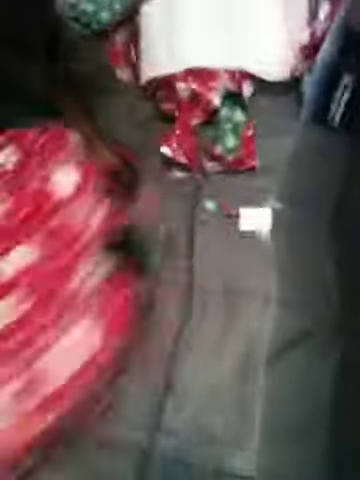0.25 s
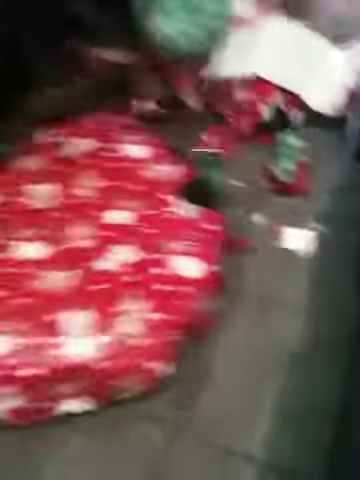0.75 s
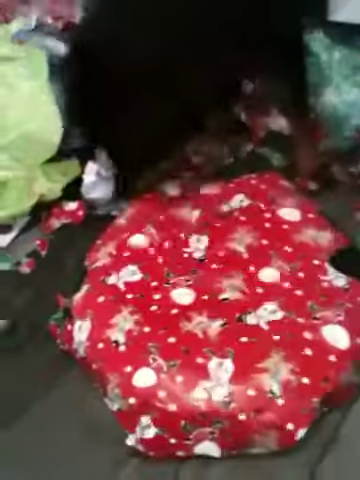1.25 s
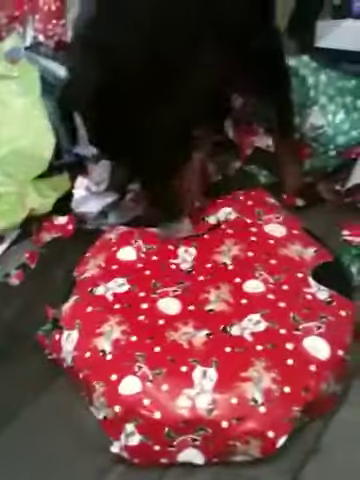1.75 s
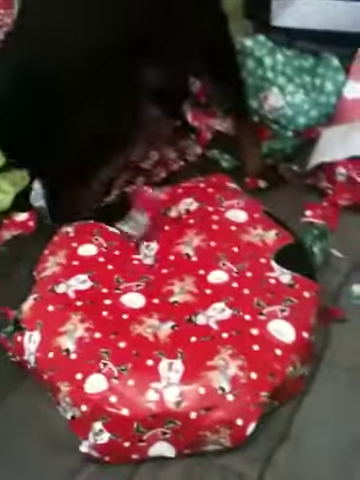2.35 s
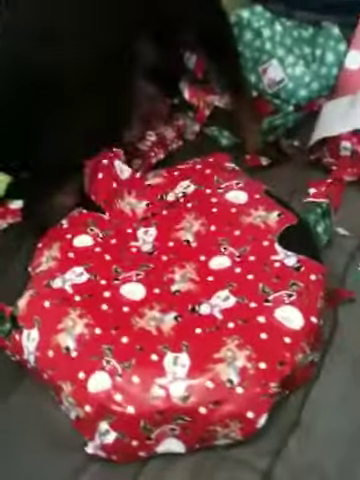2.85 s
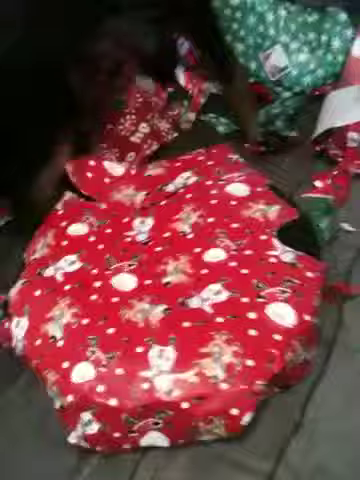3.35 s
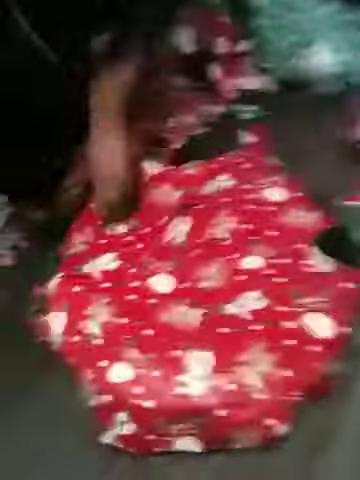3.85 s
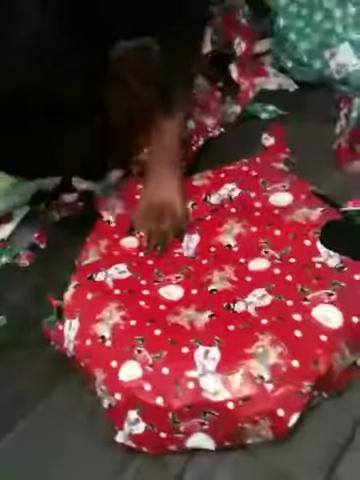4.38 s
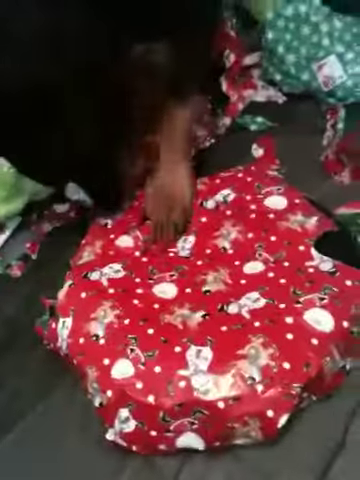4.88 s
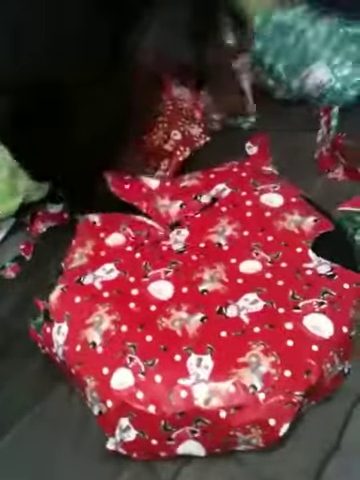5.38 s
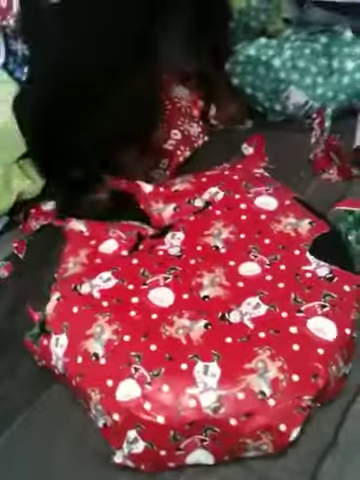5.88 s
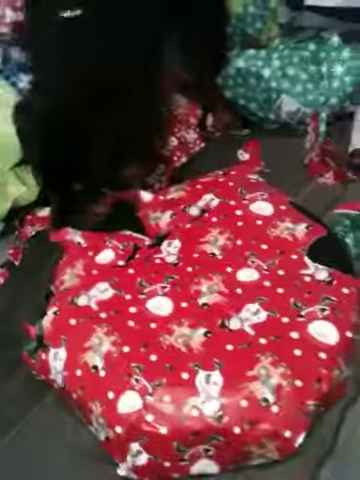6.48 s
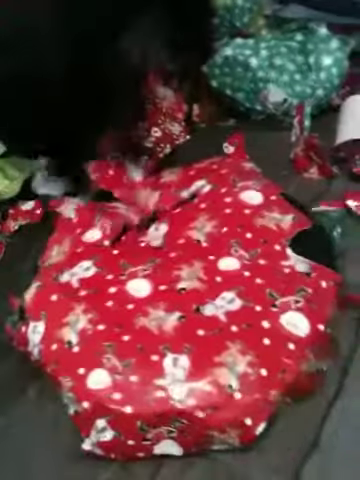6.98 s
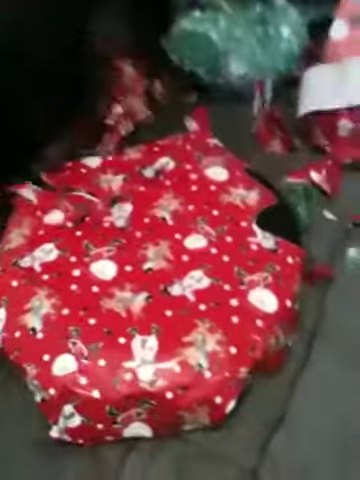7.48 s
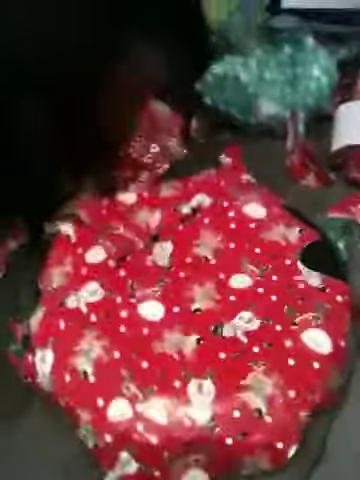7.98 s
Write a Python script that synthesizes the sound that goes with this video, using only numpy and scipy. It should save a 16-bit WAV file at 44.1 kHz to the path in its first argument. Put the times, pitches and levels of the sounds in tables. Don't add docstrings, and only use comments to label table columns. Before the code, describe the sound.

A puppy paws and tears at stiff wrapping paper on a large parcel, heard close on a phone microphone in a small furnished room with a short, soft reverberation. Quick crinkles open the scene, thin out from about 0.4 to 1.1 seconds, then swell into dense, bright crackling and tearing between 1.2 and 2.0. A near-silent lull follows, with tiny ticks, until a sharp snap at 2.8 and renewed rustling around 3.0 to 3.7. The strongest handling comes from 4.0 to 4.8: hard snaps at about 4.07, 4.27 and 4.53, with hollow, drum-like boom from the taut sheet. Crisp ripping continues around 5.1 to 5.2, then lighter scattered crinkles, with a small burst near 6.7. It is almost quiet from 7.0 to 7.7, before a final flurry of crackles to the end. Low room hiss and a very faint high whine stay constant underneath.

```python
import sys
import numpy as np
from scipy import signal
from scipy.fft import rfft, irfft
from scipy.io import wavfile

SR = 44100
rng = np.random.default_rng(int(sys.argv[2]) if len(sys.argv) > 2 else 0)


def generate_wav(sig):
    pcm = np.round(np.clip(np.atleast_2d(sig).T, -1, 1) * 32767).astype(np.int16)
    wavfile.write(sys.argv[1], SR, pcm)


def gain_from_db(level_db):
    decades = np.asarray(level_db, float) / 20
    return 10 ** decades


N = 362943

EDGES_HZ = 100 * 2 ** np.arange(0, 7.5, 1 / 3)
CENTRES_HZ = np.sqrt(EDGES_HZ[1:] * EDGES_HZ[:-1])

# (time [s], crackle level [dB], parcel boom re crackle [dB],
# crispness re crackle [dB], loudest pitch [Hz])
HANDLING = [(0.0, -47, -6, -12, 2000), (0.13, -54.5, -7, -8, 1710), (0.23, -48, -12, -10.5, 2990),
            (0.5, -65, -5, -11.5, 1810), (0.62, -56, -8, -14, 1140), (0.66, -64, -2, -8, 1390),
            (1.08, -57.5, -5, -20, 1980), (1.12, -58, -10, -10, 1300), (1.19, -64, -2, -13, 2670),
            (1.24, -60, -6, -7, 3000), (1.28, -48.5, -4, -19, 1580), (1.4, -44, -10, -11, 2590),
            (1.42, -54, -11, -12, 2770), (1.46, -52, -13, -15, 1860), (1.58, -48.5, -15, -12, 3220),
            (1.6, -49, -7, -16, 3500), (1.72, -42, -9, -5.5, 2630), (1.81, -47, -15, -10.5, 2970),
            (1.88, -41, -7.5, -9, 2620), (1.97, -50, -6, -12, 2620), (2.06, -79, 10, -14, 1850),
            (2.08, -73, 4, -11, 1070), (2.48, -83.5, 0, -2, 2300), (2.54, -64, -10, -12, 3500),
            (2.63, -88.5, 16, -5, 1440), (2.73, -89, -2, -1, 1290), (2.79, -57, -24, -17, 1770),
            (2.84, -67, -7, -21, 1740), (3.03, -54, -11, -9, 3010), (3.09, -58, -7, -11, 1240),
            (3.14, -48, -12, -16, 2060), (3.16, -56, -5, -10, 2200), (3.23, -49.5, -3, -15.5, 1320),
            (3.32, -74, -6, -11, 1200), (3.39, -73, -3, -7, 2100), (3.48, -70, 1, -17, 1140),
            (3.6, -64.5, -9, -20, 1740), (3.64, -50.5, -13, -15, 1560), (3.71, -54, -14, -15, 2370),
            (3.78, -75.5, -6, -13, 1750), (3.96, -48, -13, -12, 1830), (4.01, -43.5, -6, -14, 2100),
            (4.08, -37, -5, -4, 1320), (4.15, -48, -4, -13, 1740), (4.19, -50, 8, -14, 1110),
            (4.24, -77, -10, -19, 1670), (4.26, -53, 16, -13, 1530), (4.29, -59.5, -1, -22, 1400),
            (4.38, -65, -5, -11, 1420), (4.51, -74.5, 15, -10, 1870), (4.54, -41.5, 8, -1.5, 1780),
            (4.56, -49, 0, -5, 1720), (4.65, -60, -3, -13, 2320), (4.72, -46.5, 0, -8, 1990),
            (4.79, -40, 0, -5.5, 2830), (4.88, -63.5, -3, -14, 2010), (4.95, -59, -6, -6, 2700),
            (5.09, -47, -8.5, -10, 3120), (5.16, -46, -6, -15, 2550), (5.22, -45.5, -17, -15, 3200),
            (5.32, -72, 2, -11, 1990), (5.41, -54.5, -7, -7, 3450), (5.48, -62, -8, -17, 1840),
            (5.52, -59, -17, -18, 1390), (5.57, -52, -10, -4, 2810), (5.62, -52, -5, -15, 1480),
            (5.73, -68.5, -17, -12, 2200), (5.8, -56, -4, -6, 2390), (5.87, -74, -18, -16, 3210),
            (5.91, -58, -14, -11, 2580), (5.96, -62, -1, -7, 1410), (5.98, -51, -15, -17, 1070),
            (6.0, -60, -18, -17, 1090), (6.05, -55.5, -8, -16, 2010), (6.1, -56, -14, -18, 1720),
            (6.35, -64.5, -7, -16, 1920), (6.39, -65, -6, -14, 1380), (6.51, -55, -7, -16, 2290),
            (6.58, -70, -6, -11, 1870), (6.62, -51, -13, -15, 1770), (6.65, -52, -16, -18, 2150),
            (6.69, -56, -19, -19, 1210), (6.72, -47, -20, -16, 1260), (6.76, -57, -18, -15, 1650),
            (6.85, -47.5, -11.5, -15, 1360), (6.97, -53.5, -5.5, -11.5, 1930), (7.15, -82, 2.5, -6, 1790),
            (7.27, -75.5, -6.5, -5, 924), (7.33, -93, 2, -6.5, 1944), (7.5, -80.5, 0, -5, 979),
            (7.54, -67, -5, -13, 1580), (7.72, -64, -9, -12, 1405), (7.77, -77, -7, -12, 2160),
            (7.82, -45, -13, -13, 1920), (7.86, -50, -17, -18, 1880), (7.88, -60, -6, -18, 2690),
            (7.91, -52.5, -27, -11, 2710), (8.0, -59, -13, -14, 1670), (8.09, -56.5, -14, -13, 2430),
            (8.14, -63, 1, -11, 2150), (8.21, -46, -20.5, -17, 2030), (8.23, -65, -9, -18, 2070)]


def crackle():
    cracks_per_s = 2200 * gain_from_db(3.5 * drift(30.0))
    at = np.flatnonzero(rng.random(N) < cracks_per_s / SR)
    s, *columns = np.transpose(HANDLING)
    level_db, boom_db, crisp_db, pitch_hz = [np.interp(at / SR, s, c) for c in columns]
    size_db = level_db + 3.03 * np.minimum(rng.exponential(1, len(at)), 4.0)
    sizes = gain_from_db(size_db + 10) * rng.choice([-1, 1], len(at))
    pitch_hz = pitch_hz * 2 ** rng.normal(0, 0.35, len(at))
    return cracks(at, sizes, pitch_hz, boom_db + 6, crisp_db + 13, focus_db=6.5, ragged_db=5.5)


# (time [s], peak level [dB], loudest pitch [Hz], boom re peak [dB],
# crispness re peak [dB], after-crack level [dB])
CREASES = [(0.023, -35, 1990, -36, -11, -5), (0.1086, -40, 918, -21, -25, -11),
           (0.1096, -38, 1420, -19, -15, -5), (0.1201, -31.5, 1830, -26, -19, -6),
           (0.1861, -44, 2230, -11, -17, -6.5), (0.2223, -35, 3210, -20, -17, 0),
           (0.3031, -34.5, 3050, -21, -17, -5.5), (0.3226, -41, 1970, -15.5, -19, -15),
           (0.4727, -44, 3070, -25, -19, -9), (0.5837, -44, 743, -13, -26, -12),
           (0.6235, -39, 1100, -18, -29, -5), (0.9182, -52.5, 1380, -15, -21, -5.5),
           (0.9931, -57, 856, -24, -20, -5), (1.052, -44.5, 1890, -40, -18, -6),
           (1.1036, -38.5, 807, -25, -15, -6), (1.2153, -47, 3390, -21, -16, -1),
           (1.2282, -37, 3160, -30, -10.5, -4), (1.3234, -31, 3700, -21.5, -22.5, -4.5),
           (1.3889, -27.5, 1770, -20, -12, -7.5), (1.4523, -36.5, 974, -24, -28, -9),
           (1.483, -39, 2630, -18, -21, -7), (1.6004, -30, 4150, -22, -8, -9),
           (1.6857, -26, 2650, -12.5, -20, -8.5), (1.8511, -29, 3830, -13, -17, -9),
           (2.2326, -58.5, 533, -6, -18, -7), (2.409, -60, 1760, -23, -17, -8),
           (2.5275, -48, 3480, -15, -15, -2.5), (2.7791, -28.5, 800, -37, -20.5, -5.5),
           (2.8718, -45.5, 3130, -15, -14, -2), (2.9078, -43, 2050, -37, -13, -9),
           (2.9377, -43, 767, -31, -20, -10), (2.9849, -55, 3540, -23, -18, -6),
           (3.0049, -37.5, 3140, -24.5, -16.5, 1), (3.1, -32.5, 880, -19.5, -24, -6),
           (3.1332, -30.5, 1880, -29, -24, -3.5), (3.2082, -41, 1960, -11.5, -22, -8),
           (3.2377, -35.5, 1350, -23, -25, -8.5), (3.372, -49.5, 1860, -9, -18, -10),
           (3.5359, -46.5, 1860, -16.5, -22, -3.5), (3.5883, -44, 972, -24, -23, -2),
           (3.6172, -40, 3470, -21, -16, -7), (3.6375, -34.5, 925, -24.5, -22, -8),
           (3.7997, -54, 939, -17, -23, -4), (3.8187, -44, 1860, -26, -28, -6),
           (3.88, -41, 1970, -16, -21, -9), (3.9031, -39.5, 1490, -20, -21, 2),
           (3.9614, -38, 1730, -26, -22, 0), (4.0211, -27.5, 3150, -13, -5, -6),
           (4.051, -26.5, 1830, -9.5, -20, -6.5), (4.0708, -16.5, 867, -13.5, -12, -10.5),
           (4.2363, -40.5, 3120, 0.5, -9, -11), (4.2673, -20, 867, -11.5, -10, -11),
           (4.3969, -50.5, 1740, -11, -20, -4), (4.496, -51, 541, 4, -4, -12),
           (4.5334, -14, 1860, -12.5, -13, -9.5), (4.6899, -37.5, 3500, -11, -5, -4),
           (4.7662, -26, 4000, -17.5, -22, -6.5), (4.9135, -52, 3010, -12, -19, -6),
           (4.9363, -43.5, 4200, -10, -14, 0), (4.9794, -39, 4170, -12, -13, 3),
           (5.0741, -32.5, 3660, -28, -20, -8), (5.1483, -29.5, 1750, -14, -20, -8),
           (5.2019, -25.5, 3670, -27, -16, -7.5), (5.3971, -41, 4100, -16.5, -16.5, -5.5),
           (5.4989, -43, 3460, -23, -25, -8), (5.5194, -43.5, 1280, -26, -28, -2),
           (5.5365, -45, 915, -19, -14, -10), (5.5631, -44, 4150, -18, -8, -11),
           (5.5732, -34.5, 5430, -18.5, -16.5, -6.5), (5.7544, -44.5, 2140, -23, -12, -5),
           (5.7938, -37.5, 1870, -24, -7, -8.5), (5.8678, -38.5, 3650, -29.5, -14, -6),
           (5.8935, -39.5, 2540, -23, -19, -5), (5.9734, -41.5, 970, -20, -28, -0.5),
           (6.137, -44.5, 1850, -20, -25, -8), (6.3896, -42.5, 1400, -22.5, -30, -5.5),
           (6.4982, -38.5, 2070, -19, -17.5, -8), (6.6199, -40.5, 861, -22.5, -23, -5.5),
           (6.6834, -44, 1940, -22, -24, -2), (6.7062, -28.5, 980, -35, -41, -4),
           (6.7935, -34.5, 1860, -21, -22, -2.5), (7.3482, -61, 1730, -18.5, -17.5, 2),
           (7.55, -49, 2520, -20, -24.5, -7.5), (7.77, -51.5, 1490, -30, -17, -6.5),
           (7.7909, -44, 1850, -11, -22, -9), (7.8084, -32.5, 1860, -22, -25, -5),
           (7.896, -33, 3330, -26, -19, -4.5), (7.9304, -36.5, 1860, -28, -18, -4),
           (8.0135, -44, 1140, -30, -24, -4), (8.075, -43, 1850, -21, -13, -4),
           (8.09, -37.5, 3150, -30, -17, -5), (8.1654, -40.5, 1900, -23, -14.5, -3),
           (8.1942, -28, 1860, -40, -27, -15.5)]


def snaps(count=7):
    s, peak_db, pitch_hz, boom_db, crisp_db, after_db = np.transpose(CREASES)[:, :, None]
    chance = rng.random((len(CREASES), 2, count))
    late = chance[:, 0] * (np.arange(count) > 0)
    at = np.round((s + 0.018 * late) * SR).astype(int)
    size_db = peak_db + 19.5 + after_db * (late > 0) - 9.8 * late
    sizes = gain_from_db(size_db) * np.sign(chance[:, 1] - 0.5)

    def spread(column):
        return np.broadcast_to(column, at.shape).ravel()

    return cracks(at.ravel(), sizes.ravel(), spread(pitch_hz), spread(boom_db + 17),
                  spread(crisp_db + 14.5), focus_db=4.0, ragged_db=3.0)


# (frequency [Hz], level [dB per Hz])
PAPER_COLOUR = [(59, -52), (100, -14), (177, -0.5), (343, -1), (502, -7.5), (854, -7), (1200, -10),
                (3780, -8.5), (5900, -16), (8280, -16), (9020, -27), (15000, -25.5), (16000, -37)]


def cracks(at, sizes, pitch_hz, boom_db, crisp_db, focus_db, ragged_db):
    boom_hz, crisp_hz = 550, 4900
    out = np.zeros(N)
    ragged = rng.standard_normal((len(at), len(CENTRES_HZ)))
    for k, hz in enumerate(CENTRES_HZ):
        db = at_hz(PAPER_COLOUR, hz) + ragged_db * ragged[:, k]
        db = db + focus_db * np.exp(-2 * np.log2(hz / pitch_hz) ** 2)
        db = db + boom_db / (1 + (hz / boom_hz) ** 6)
        db = db + crisp_db / (1 + (crisp_hz / hz) ** 6)
        clicks = np.bincount(at, sizes * gain_from_db(db), N)[:N]
        out += band(clicks, k)
    return out


# (frequency [Hz], width [Hz], level [dB])
PARCEL_MODES = [(310, 136, 0), (867, 165, -4), (1860, 86, -3), (2470, 47, -46), (3100, 35, -18),
                (3700, 200, -6), (7000, 57, -16)]


def parcel(x):
    out = x.copy()
    for hz, width_hz, level_db in PARCEL_MODES:
        r = np.exp(-np.pi * width_hz / SR)
        rings = signal.lfilter([1, 0, -1], [1, -2 * r * np.cos(2 * np.pi * hz / SR), r * r], x)
        out += gain_from_db(0.7 * level_db - 4.0) * (1 - r * r) / 2 * rings
    return out


def room(x, count=6):
    room_db = -1.5
    share = np.array([drift(6.8) for spot in range(count)])
    share = share / np.linalg.norm(share, axis=0)
    wet = sum(signal.oaconvolve(x * w, echoes())[:N] for w in share)
    return x + gain_from_db(room_db) * wet


# (frequency [Hz], time to fall 60 dB [s])
ROOM_DECAY = [(150, 0.15), (1000, 0.19), (4000, 0.17), (14000, 0.084)]


def echoes():
    t = np.arange(SR // 2) / SR
    white = rng.standard_normal((2, len(t))) * np.clip(t / 0.0033 - 0.4, 0, 1)
    out = np.zeros(len(t))
    for k, hz in enumerate(CENTRES_HZ):
        decay = gain_from_db(-60 * t / at_hz(ROOM_DECAY, hz))
        dying = band(white[k % 2] * decay, k)
        out += dying / np.linalg.norm(dying) * np.sqrt(hz / SR / 2)
    return out


# (frequency [Hz], level [dB per Hz])
HISS_COLOUR = [(24, -50), (40, -28), (59, -19.5), (110, -6.5), (204, -2.5), (359, -6.5), (665, -10),
               (1780, -10.5), (7640, -19.5), (13500, -19), (14500, -15)]


def hiss():
    hiss_db = -71
    hz = np.maximum(np.fft.rfftfreq(N, 1 / SR), 1)
    colour = gain_from_db(at_hz(HISS_COLOUR[:-1], hz))
    noise = rms_one(irfft(rfft(rng.standard_normal(N)) * colour, N))
    return gain_from_db(hiss_db + 0.29 * drift(3.5)) * noise


# (frequency [Hz], level [dB rms])
WHINE_TONES = [(14912, -85), (14971, -87.5), (15030, -95.5), (15089, -95)]


def whine():
    t = np.arange(N) / SR
    return sum(gain_from_db(db + 4) * np.sin(2 * np.pi * hz * t) for hz, db in WHINE_TONES)


def rms_one(x):
    return x / np.sqrt(np.mean(x ** 2) + 1e-20)


def at_hz(points, hz):
    table_hz, values = np.array(points)[:, 0], np.array(points)[:, 1]
    return np.interp(np.log(hz), np.log(table_hz), values)


def band(x, k):
    sos = signal.butter(2, EDGES_HZ[k:k + 2], "band", fs=SR, output="sos")
    return (-1) ** k * signal.sosfilt(sos, x + 1e-18)


def drift(rate):
    r = np.exp(-80 * np.pi * rate / SR)
    slow = signal.lfilter([1], [1, -2 * r, r * r], rng.standard_normal(N // 40 + 2002))[2000:]
    return np.interp(np.arange(N) / 40, np.arange(len(slow)), rms_one(slow))


def scene():
    paper = crackle() + snaps()
    return (room(parcel(paper)) + hiss() + whine())[None]


def top_cut(x):
    return signal.sosfilt(signal.butter(12, 16440, fs=SR, output="sos"), x)


def record(dry):
    thin = signal.sosfilt(signal.butter(2, 90, "high", fs=SR, output="sos"), dry)
    thin = signal.sosfilt(signal.cheby2(10, 40, 15950, fs=SR, output="sos"), thin)
    return top_cut(thin)


dry = scene()
out = record(dry)
generate_wav(out)
```